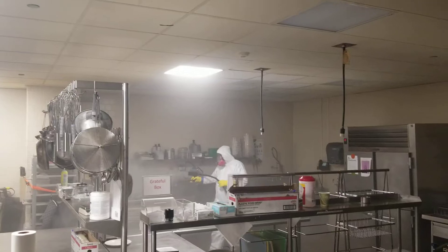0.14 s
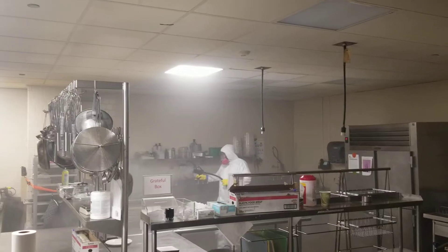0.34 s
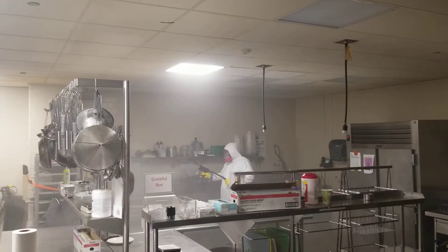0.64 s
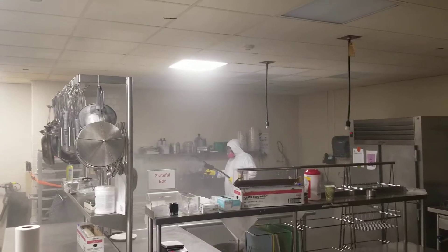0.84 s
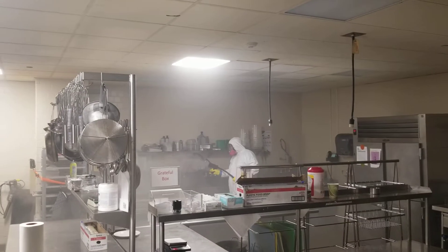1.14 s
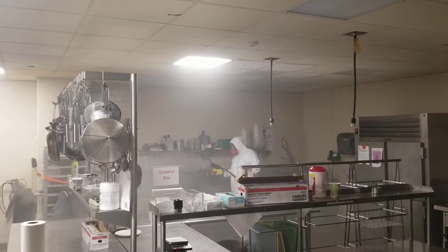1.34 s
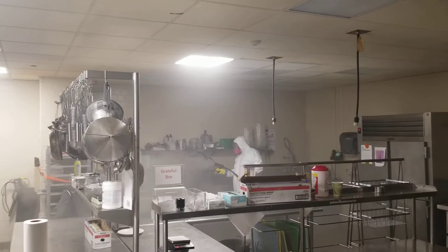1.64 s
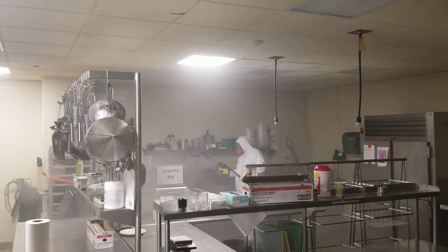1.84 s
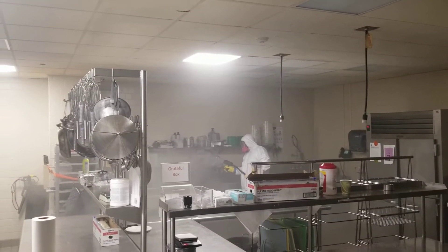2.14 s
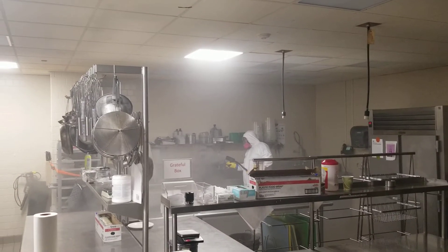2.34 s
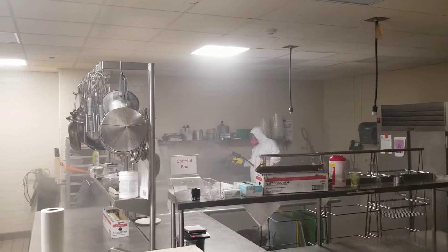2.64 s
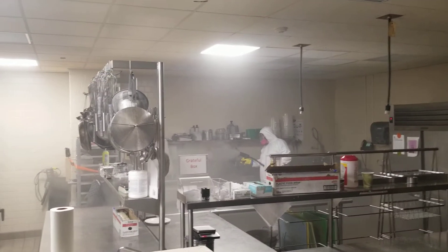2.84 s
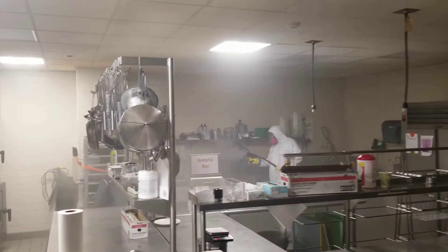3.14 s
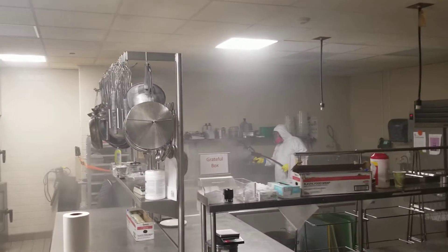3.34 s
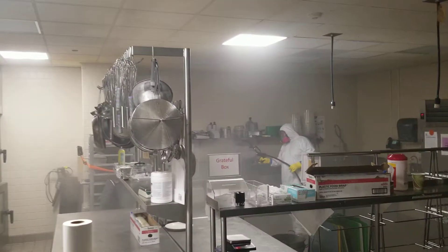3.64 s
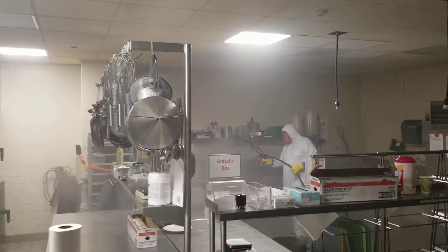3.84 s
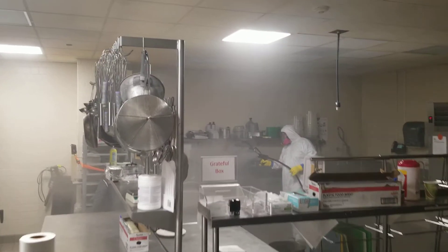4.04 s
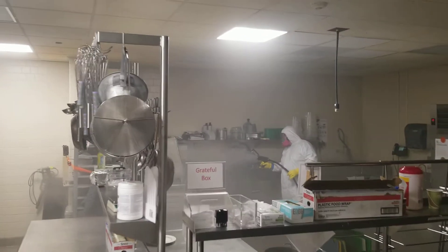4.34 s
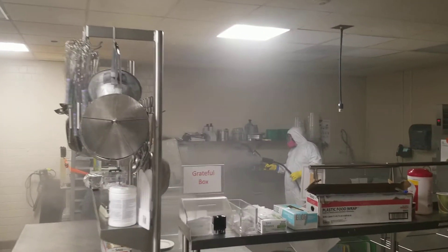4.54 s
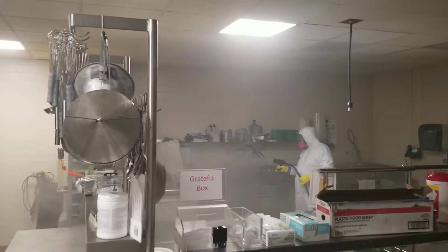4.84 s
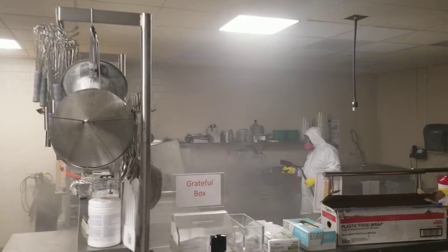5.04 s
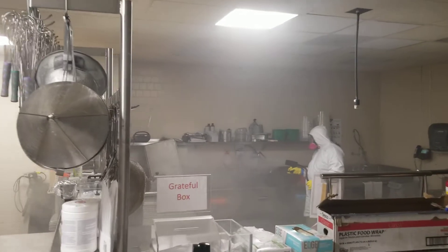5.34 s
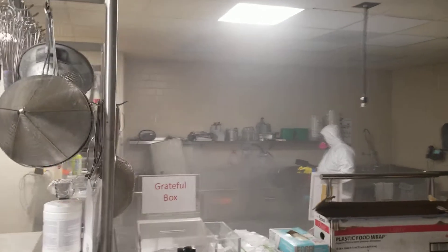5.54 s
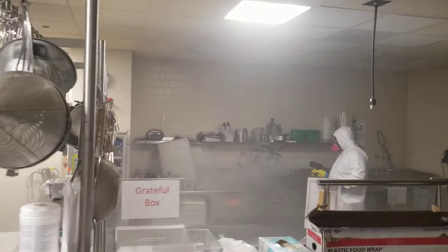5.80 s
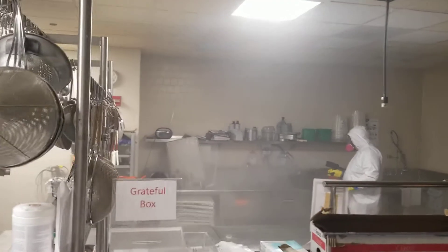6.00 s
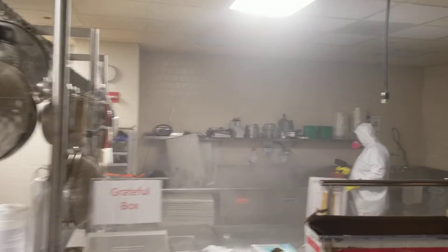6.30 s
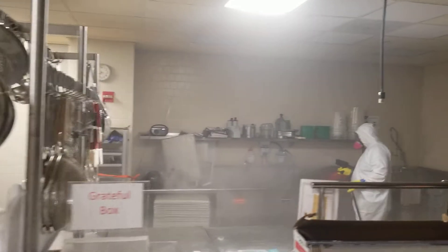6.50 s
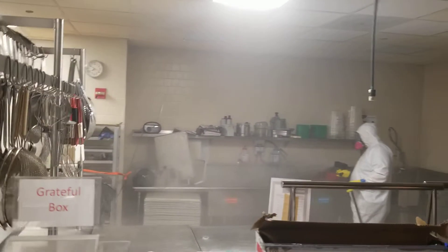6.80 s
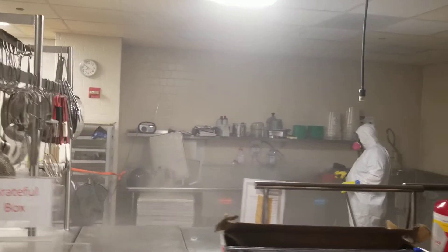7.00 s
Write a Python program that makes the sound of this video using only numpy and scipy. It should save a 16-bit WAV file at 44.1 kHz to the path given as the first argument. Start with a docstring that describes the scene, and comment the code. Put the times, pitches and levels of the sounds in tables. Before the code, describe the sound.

Hand-held stereo capture of a steady airy spray jet across a hard-surfaced kitchen, with soft fan rumble and wavering compressor tones underneath. An early cluster of sharp plastic snaps and brief skin rub hits the left side only, opening up its treble as overall level dips. The hiss then holds nearly constant with slight flutter, punctuated by a faint tick near three seconds and clearer ones near five and six.

```python
"""Fogger in a tiled kitchen

A fogger's broadband jet hiss crosses a tiled kitchen over ventilation rumble and refrigeration tones.
A fingertip snaps off the left microphone port of a hand-held camera and slides away: damped clicks, skin grain.
The left hiss brightens as its port resonance climbs; the snap makes the gain control drop its lift.
The grip ticks a few more times: damped sine cycles, left port only."""
import sys
import numpy as np
from scipy import signal
from scipy.io import wavfile
from scipy.ndimage import uniform_filter1d

SR = 44100
rng = np.random.default_rng(int(sys.argv[2]) if len(sys.argv) > 2 else 0)


def pcm_store(signal):
    """Save signal as 16-bit PCM."""
    levels = np.round(np.clip(np.atleast_2d(signal), -1, 1) * 32767)
    wavfile.write(sys.argv[1], SR, levels.astype(np.int16).T)


N = 315756

# All source levels are ahead of the gain control.
# Ventilation spectrum, right port, before the treble cut: f/Hz, density/(dB per Hz)
RUMBLE_DB_PER_HZ = [(20, -100), (35, -94.5), (60, -77.3), (90, -83), (130, -85), (165, -87), (190, -91.5),
                    (215, -89), (260, -90), (330, -93.5), (420, -93), (600, -99.5)]
# Left-right likeness of the rumble: f/Hz, correlation/1
RUMBLE_LIKENESS = [(25, .85), (60, 0.96), (200, 0.91), (400, 0.7), (700, 0.42)]

# Compressor and fan tones: f/Hz
TONE_HZ = [120.1, 138.6, 156.8, 240.2, 278.9, 297.1, 313.6, 360, 469.4]
# Same tones, right port, before spots and waver: initial rms level/dB, fade/(dB per s)
TONE_LEVELS = [(-58, 0.5), (-55, 2.5), (-64.5, 1), (-76, 1.5), (-77.5, -0.6), (-69, 2.7), (-77, 1.1),
               (-81, 0.5), (-73.5, 0)]
# Loud and dead spots of the room along the walk, one list per tone: t/s, width/s, change/dB
ROOM_SPOTS = [
    [(0.95, 0.16, 4.5), (3.8, 0.5, -8), (4.37, 0.15, -9), (3.05, 0.35, -5), (6.8, .4, 0.5)],
    [(.84, 0.11, -21), (2.3, 0.36, -7), (3.0, 0.26, 8), (3.65, 0.2, -8), (5.6, 0.29, -5), (6.7, 0.31, 11),
     (5.15, 0.14, 6)],
    [(1.34, 0.18, 4), (4.44, 0.14, 3), (5.4, 0.17, 13), (0.63, .08, -16), (7, 0.4, -21)],
    [(1.8, .5, -7)],
    [(.5, 0.33, -13), (1.4, 0.14, -17), (2.8, 0.27, -2), (3.6, 0.53, 5), (4.9, 0.25, -6)],
    [(.3, 0.37, -27), (3.1, 0.24, 5.5), (3.75, 0.21, -19), (4.65, .15, 12.5), (5.6, .25, -1)],
    [(.15, 0.13, 2), (3.0, 0.25, 2), (3.8, .3, -15), (5.85, 1, 14.5)],
    [(3.1, .3, 6)],
    [(2.4, 0.73, -7.5), (4.7, 1, 5), (6.6, 0.82, -20)],
]

# Grip and fingertip ticks at the left port: t/s, envelope peak/dB, f/Hz, rise/ms, sign of first swing,
# low push scale/dB, shell ring scale/dB
TICK_EVENTS = [(0.7609, -9.5, 1850, 0.25, -1, -50, -55), (0.7712, -19, 900, 0.53, -1, -50, -60),
               (.7875, -28, 2620, 0.23, -1, -42, -50), (.7930, -16, 2700, 0.12, 1, -49, -50),
               (0.797, -29, 2400, 0.11, -1, -45, -50), (0.8021, -24, 1490, 0.19, 1, -36, -55),
               (.8097, -32, 1290, 0.26, 1, -45, -60), (0.8128, -19.5, 790, 0.57, -1, -45, -60),
               (0.817, -24, 950, 0.63, 1, -38, -60), (0.8233, -32, 2400, 0.32, 1, -50, -55),
               (.8410, -37, 1000, .5, 1, -50, -60), (2.9813, -27.5, 1520, 0.37, 1, -60, -60),
               (4.9, -18, 1970, 0.3, 1, -60, -42), (5.952, -14, 2420, 0.14, 1, -23.5, -23),
               (5.9585, -38, 1510, .7, 1, -60, -60)]
# Brief tonal lumps in the rub noise: t/s, f/Hz, half-width/ms, peak/dB
RUB_LUMPS = [(0.78, 1150, 3.4, -31), (.788, 211, 18, -38.5), (.812, 425, 15, -35), (.831, 2750, 4, -34),
             (0.837, 970, 4.5, -39), (.878, 162, 20, -36)]
# Skin rub colour, before tilt and levelling: f/Hz, level/dB
RUB_COLOUR_DB = [(140, -31), (220, -18), (500, -13.5), (700, -9.5), (1500, -8), (2100, -13), (2800, -7.5),
                 (3500, -10.5), (4100, -13), (9000, -18.5)]

# Jet hiss by port, before level changes and the bass cut: f/Hz, density/(dB per Hz)
LEFT_COVERED_DB_PER_HZ = [(600, -93.0), (1300, -96.6), (1700, -92.8), (2300, -88.5), (4000, -82.7),
                          (5500, -80.6), (7200, -78.1), (9300, -78.4), (10300, -76.3), (11500, -71.2),
                          (12700, -68.4), (14050, -72), (14400, -75.2), (15500, -76.5)]  # half covered
LEFT_FREE_DB_PER_HZ = [(300, -91.5), (600, -94.5), (1100, -94.5), (1700, -90.5), (2400, -86), (4000, -82.5),
                       (6000, -77), (8000, -73), (9200, -75), (10500, -69.5), (12000, -63), (13500, -56),
                       (14500, -55.5), (15600, -54)]
RIGHT_DB_PER_HZ = [(600, -98.5), (950, -102.0), (1900, -95.0), (3700, -92.1), (5000, -84.8), (6000, -84.4),
                   (6900, -91.8), (8200, -81.7), (9300, -84.5), (10700, -76.2), (12600, -69.9),
                   (14150, -70.8), (14500, -75.5), (15500, -79.4)]
# Approach of the camera and sweep of the nozzle: t/s, left change/dB, extra left top treble/dB, right change/dB
SPRAY_CHANGE_DB = [(0, 0, 2.5, 0.2), (.6, -0.5, 1.5, -0.7), (1.0, 0, -2, 2.5), (1.3, -1.9, 1, 0),
                   (1.6, -2, 0, 0), (1.9, -2, 1.5, 0), (2.3, -2, 3, 0), (2.6, -2, 0.5, 0), (2.9, -1, -1, 0),
                   (3.3, -1, 0.5, 1), (3.8, -.5, 1, 1), (4.3, -0.5, 2, 1.7), (4.85, 0.5, -0.5, 1.5),
                   (5.15, 1.2, 0.5, 1.3), (5.65, .9, 0.5, 2), (6.05, 1.5, 1.5, 1.7), (6.5, 0.8, 0, 0.9),
                   (7.1, 0.2, 0.5, 1.5)]
# Share of the left change taken at each frequency: f/Hz, share/1
LEFT_CHANGE_SHARE = [(2000, 0.77), (7000, 1.05), (11000, 1.3), (13500, 1.47), (14500, 0.77), (15700, 0.41)]

# Fingertip presses, snaps, slides off the port
PRESS_S, PRESS_WIDTH_S, PRESS_SHARE = .763, .014, 0.33
LIFT_S, LIFT_LENGTH_S = 0.777, 0.062
CLIMB_S, CLIMB_LENGTH_S, COVERED_PITCH_RATIO = 0.82, .05, .88  # resonance pitch re free port
TOP_TREBLE_HZ = 12400

RUB_START_S, RUB_PEAK_S, RUB_END_S, RUB_PEAK_RMS_DB = 0.722, 0.801, 0.96, -29
RUB_RISE_DB, RUB_FALL_DB_PER_S, RUB_LEAVE_S = 31, 136, 0.027
PEAK_TILT_DB_PER_OCT, TILT_DB_PER_OCT_PER_DB = -1.2, 0.51  # second: duller per dB under the peak

EDGE_HZ = 15740


def amp(db):
    """dB to amplitude ratio."""
    return 10 ** (np.asarray(db) / 20)


def evened(x):
    """Scale to rms 1."""
    return x / np.sqrt(np.mean(x ** 2) + 1e-20)


def read(points, hz):
    """Interpolate a spectrum table over log frequency."""
    f, value = np.transpose(points)
    return np.interp(np.log(hz + 1), np.log(f + 1), value)


def column(rows, t, order):
    """Interpolate one table column over time."""
    rows = np.asarray(rows)
    return np.interp(t, rows[:, 0], rows[:, order])


def bump(t, s, width):
    """Gaussian of peak 1 at time s."""
    return np.exp(-((t - s) / width) ** 2)


def eased(t, s, length):
    """Smooth rise from 0 to 1."""
    return np.sin(np.pi / 2 * np.clip((t - s) / length, 0, 1)) ** 2


def drift(t, top_hz, count=24):
    """Slow random sum of sines, rms 1, stronger at low rates."""
    total = 0
    for f in np.geomspace(top_hz / 20, top_hz, count):
        total = total + np.sin(2 * np.pi * (f * t + rng.random())) / np.sqrt(f)
    return evened(total)


def white(size):
    """Short-time spectra of two unrelated noises of 0 dB per Hz."""
    noise = np.sqrt(SR / 2) * rng.standard_normal((2, N))
    return signal.stft(noise, SR, nperseg=size, noverlap=size * 3 // 4)


def heard(z, size):
    """Short-time spectra back to samples."""
    return signal.istft(z, SR, nperseg=size, noverlap=size * 3 // 4)[1][..., :N]


def ventilation(left_db=3):
    """Low rumble: noise whose ports agree most in the bass, less higher up."""
    hz, t, z = white(size=2048)
    same = np.clip(read(RUMBLE_LIKENESS, hz), -1, 1)[:, None]
    left = amp(left_db) * z[0]
    right = same * z[0] + np.sqrt(1 - same ** 2) * z[1]
    treble_cut = 1 / (1 + (hz / 900) ** 4)
    colour = treble_cut * amp(read(RUMBLE_DB_PER_HZ, hz))
    return heard(np.array([left, right]) * colour[:, None], size=2048)


def hum(left_db=2.5, waver_rms_db=0.6, waver_rms_turns=.016):
    """Machine tones of fixed pitch; level follows fades and room spots, level and phase waver slightly."""
    t = np.arange(N) / SR
    slow, out = t[::441], np.zeros(N)
    for hz, (db, fade_db_per_s), spots in zip(TONE_HZ, TONE_LEVELS, ROOM_SPOTS):
        walk_db = db - fade_db_per_s * slow
        walk_db += sum(change_db * bump(slow, s, width_s) for s, width_s, change_db in spots)
        level_db = np.interp(t, slow, walk_db + waver_rms_db * drift(slow, top_hz=19.0))
        phase_turns = hz * t + np.interp(t, slow, waver_rms_turns * drift(slow, top_hz=3.6))
        out += np.sqrt(2) * amp(level_db) * np.sin(2 * np.pi * phase_turns)
    return out * amp([[left_db], [0]])


def rub_under_peak_db(t):
    """Slide level below its peak: curved rise, steady dB fall, quick departure from the housing."""
    rise_db = RUB_RISE_DB * np.clip((RUB_PEAK_S - t) / (RUB_PEAK_S - RUB_START_S), 0, 1) ** 1.66
    fall_db = RUB_FALL_DB_PER_S * np.maximum(t - RUB_PEAK_S, 0)
    leave_db = 20 * np.log10(np.clip((RUB_END_S - t) / RUB_LEAVE_S, 1e-3, 1))
    return rise_db + fall_db - leave_db


def rub(grain_rms_db=1.2, unevenness_rms_db=1.5):
    """Skin slips over the port in dense uneven grains, duller as the slide weakens."""
    t = np.arange(N) / SR
    grain = uniform_filter1d(uniform_filter1d(rng.standard_normal(N), size=90), size=90)
    grains = amp(grain_rms_db * evened(grain))
    hz, frames, z = white(size=256)
    under_peak_db = np.minimum(rub_under_peak_db(frames), 40)
    tilt_db_per_oct = PEAK_TILT_DB_PER_OCT - TILT_DB_PER_OCT_PER_DB * under_peak_db
    octaves = np.log2((hz[:, None] + 80) / 800)
    colour = amp(read(RUB_COLOUR_DB, hz)[:, None] + octaves * tilt_db_per_oct)
    uneven = uniform_filter1d(rng.standard_normal(colour.shape), size=4, axis=0)
    uneven = uniform_filter1d(uneven, size=5, axis=1)
    colour *= amp(unevenness_rms_db * evened(uneven))  # over frequency and time
    colour /= np.sqrt((colour ** 2).sum(0) * hz[1])  # equal power per frame
    skin = heard(z[0] * colour, size=256) * evened(grains)
    sliding = (t > RUB_START_S) * (t < RUB_END_S)
    return skin * amp(RUB_PEAK_RMS_DB - rub_under_peak_db(t)) * sliding


def ticks(push_hz=330, shell_hz=3650, push_decay_ms=0.85, shell_decay_ms=.8):
    """Damped cycles of the plastic housing, over a dull push of air and a thin shell ring."""
    t, out = np.arange(400) / SR, np.zeros(N)
    push_delay_s, shell_rise_s = .0003, .0004
    push = -np.exp(-1000 * t / push_decay_ms)
    push *= np.sin(2 * np.pi * push_hz * np.maximum(t - push_delay_s, 0))
    shell = np.exp(-1000 * t / shell_decay_ms) * np.minimum(t / shell_rise_s, 1)
    shell *= np.sin(2 * np.pi * shell_hz * t)
    for s, db, hz, rise_ms, swing, push_db, shell_db in TICK_EVENTS:
        u = 1000 * t / rise_ms
        envelope = (u * np.exp(1 - u)) ** 2
        tap = np.sign(swing) * envelope * np.sin(2 * np.pi * hz * t)
        out[round(s * SR):][:len(t)] += amp(db) * tap + amp(push_db) * push + amp(shell_db) * shell
    return out


def rub_lumps(sag=0.1):
    """Brief tonal lumps in the rub noise: Gaussian sine bursts, pitch falling slightly."""
    t, out = np.arange(SR) / SR, np.zeros(N)
    start_turns = rng.random((len(RUB_LUMPS), 1))
    for (s, hz, ms, db), start in zip(RUB_LUMPS, start_turns):
        sagging = 1 - sag * np.tanh(500 * (t - s) / ms) / 2
        phase_turns = hz * (t - s) * sagging + start
        out[:SR] += amp(db) * bump(t, s, ms / 1000) * np.sin(2 * np.pi * phase_turns)
    return out


def jet(patch_rms_db=1.02, flutter_rms_db=0.27):
    """Turbulent hiss, noise unrelated at the two ports, coloured by each port; flutter is common."""
    hz, t, z = white(size=512)
    hz = hz[:, None]
    free = eased(t, LIFT_S, LIFT_LENGTH_S) - PRESS_SHARE * bump(t, PRESS_S, PRESS_WIDTH_S)
    climb = eased(t, CLIMB_S, CLIMB_LENGTH_S)
    pitch_ratio = COVERED_PITCH_RATIO + (1 - COVERED_PITCH_RATIO) * climb

    free_db = read(LEFT_FREE_DB_PER_HZ, hz / pitch_ratio)  # a narrower opening rings lower
    free_db -= 60 * np.maximum(np.log2((hz + 1) / pitch_ratio / 16000), 0)  # falls above the peak
    left_db = (1 - free) * read(LEFT_COVERED_DB_PER_HZ, hz) + free * free_db
    left_db += column(SPRAY_CHANGE_DB, t, order=1) * read(LEFT_CHANGE_SHARE, hz)
    top_share = 1 / (1 + (TOP_TREBLE_HZ / (hz + 1)) ** 16)
    left_db += column(SPRAY_CHANGE_DB, t, order=2) * top_share
    right_db = read(RIGHT_DB_PER_HZ, hz) + column(SPRAY_CHANGE_DB, t, order=3)

    patches = uniform_filter1d(rng.standard_normal((2, len(t), len(hz))), size=30, axis=1)
    patches = evened(uniform_filter1d(patches, size=12, axis=2)).transpose(0, 2, 1)
    flutter_db = flutter_rms_db * drift(t, top_hz=18)
    bass_cut = 1 / (1 + (350 / (hz + 1)) ** 4)  # a small jet makes no bass
    level_db = np.array([left_db, right_db]) + patch_rms_db * patches + flutter_db
    return heard(z * bass_cut * amp(level_db), size=512)


def scene():
    """Room and jet at both ports, touch at the left only."""
    touch = rub() + ticks() + rub_lumps()
    return ventilation() + hum() + jet() + touch * np.array([[1], [0]])


def record(dry, boost_db=10, settle_s=.09, trip_level=.12):
    """Gain lift fades for good once the sound under 4 kHz trips it; soft limit, then treble edge."""
    low = signal.sosfilt(signal.butter(4, 4000, fs=SR, output="sos"), dry)
    tripped = np.maximum.accumulate(abs(low).max(0)) > trip_level
    keep = np.exp(-1 / (settle_s * SR))
    settled = signal.lfilter([1 - keep], [1, -keep], tripped * 1.)
    lifted = dry * amp(boost_db * (1 - settled))
    rounded = lifted / (1 + lifted ** 8) ** (1 / 8)  # input stage rounds off near full scale
    taps = signal.firwin(2047, EDGE_HZ, window=("kaiser", 9), fs=SR)
    return signal.oaconvolve(rounded, taps[None], "same")


dry = scene()
out = record(dry)
pcm_store(out)
```